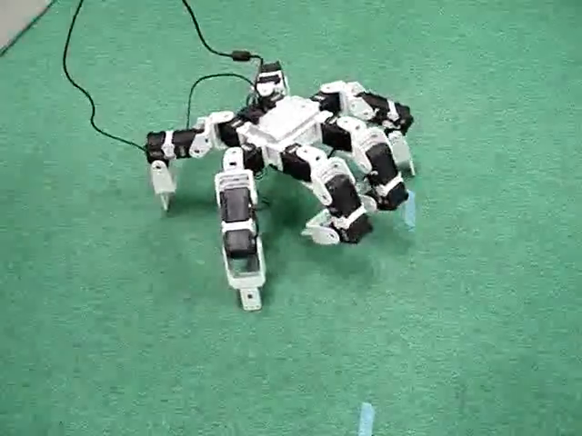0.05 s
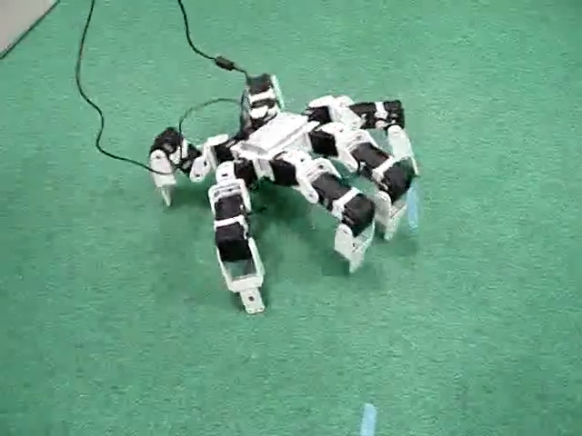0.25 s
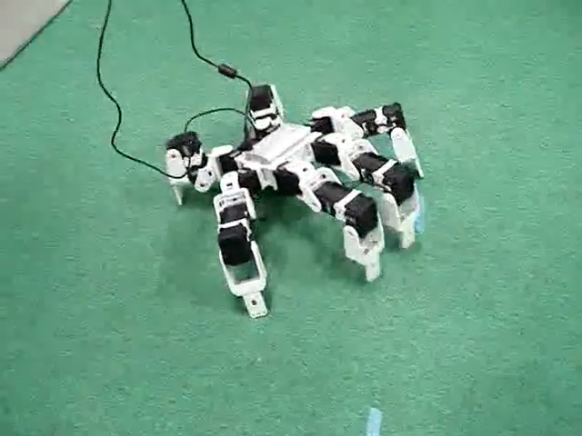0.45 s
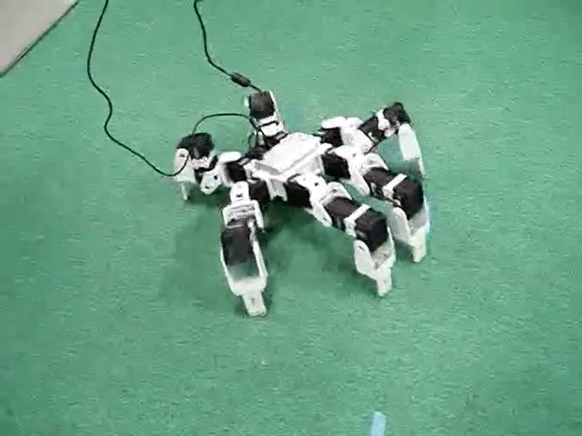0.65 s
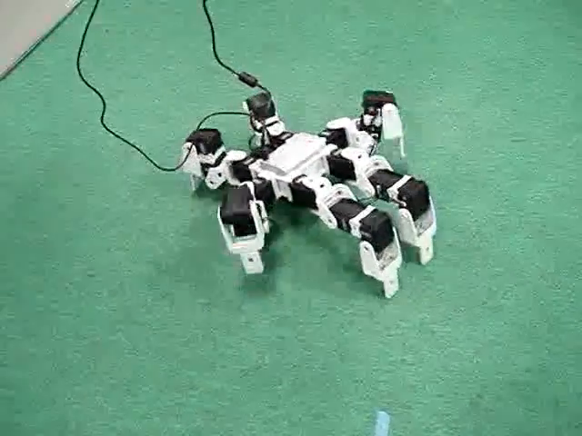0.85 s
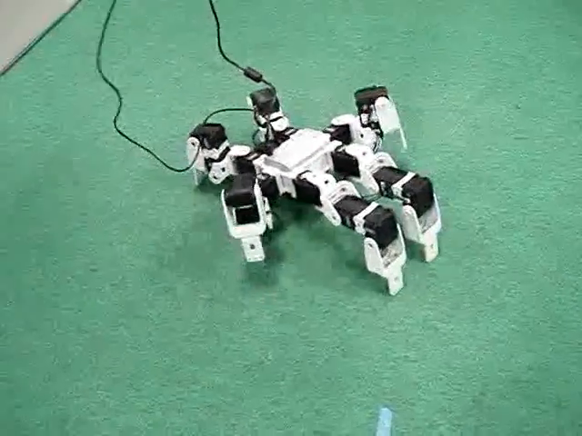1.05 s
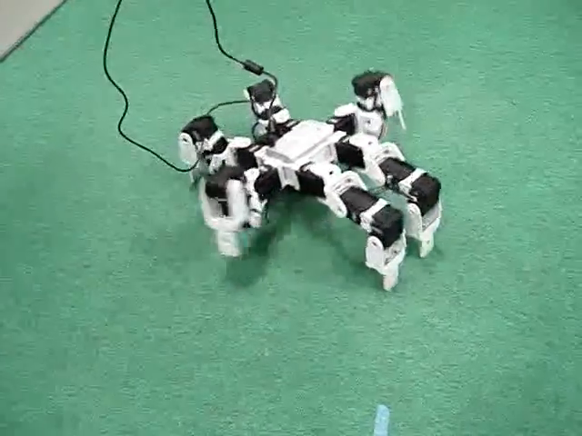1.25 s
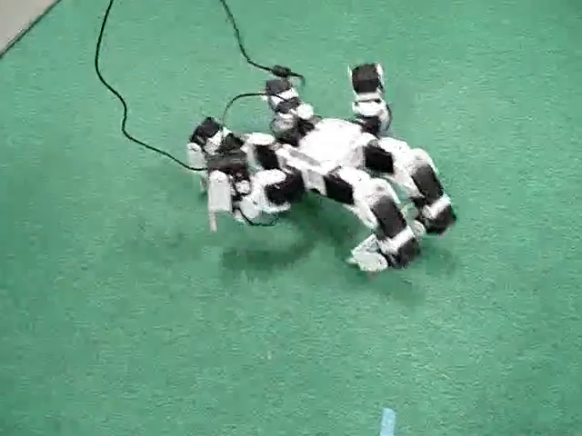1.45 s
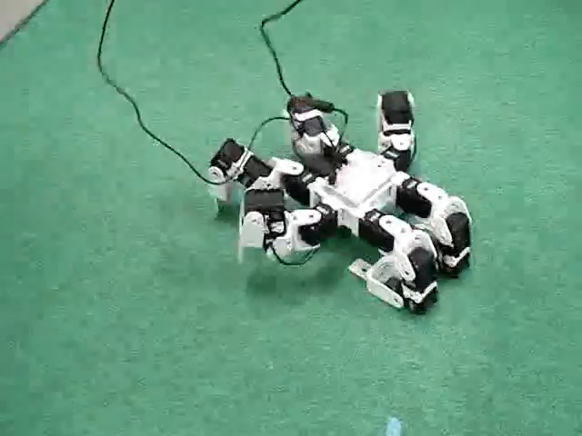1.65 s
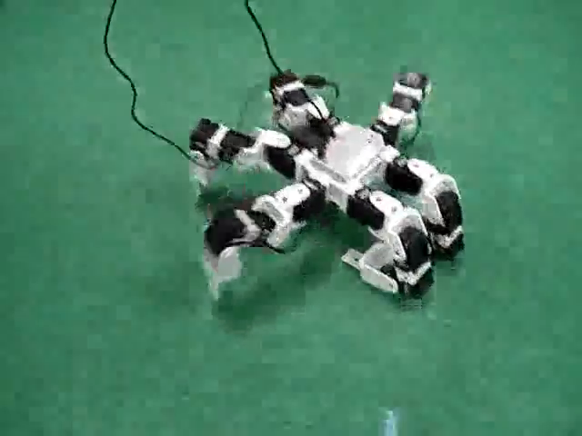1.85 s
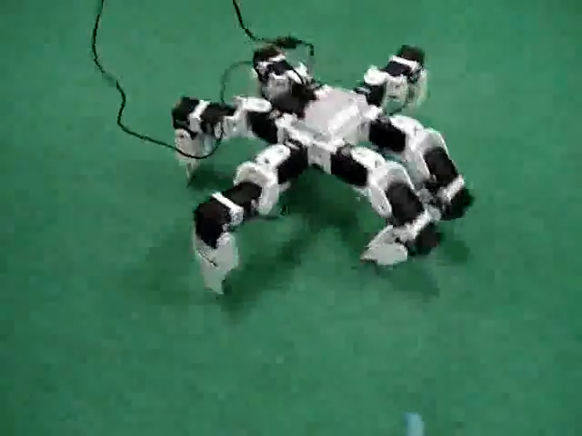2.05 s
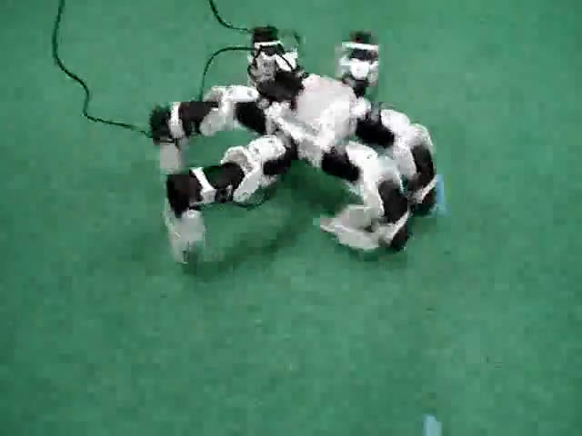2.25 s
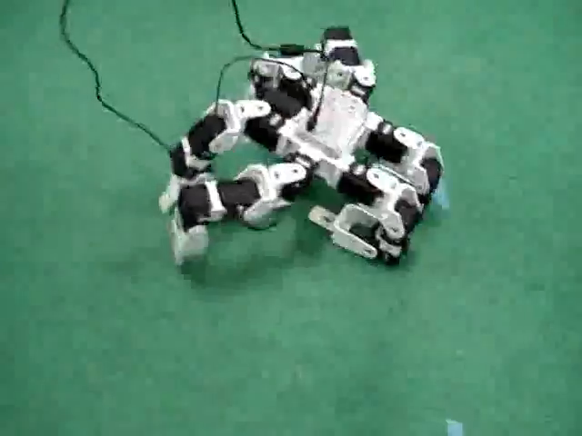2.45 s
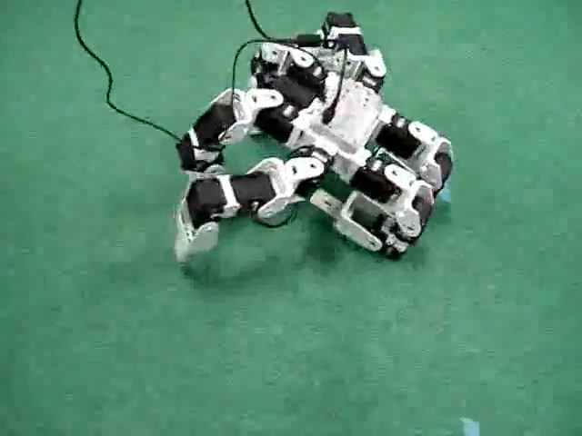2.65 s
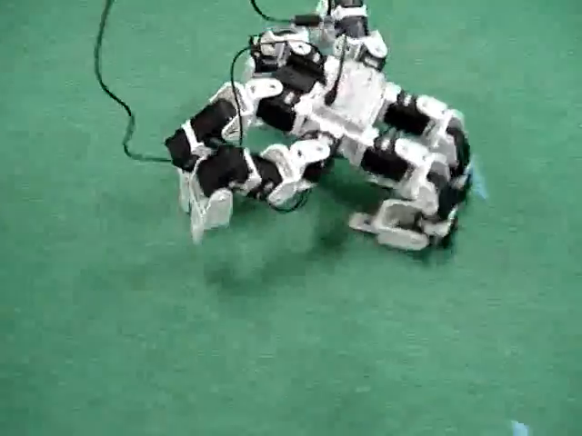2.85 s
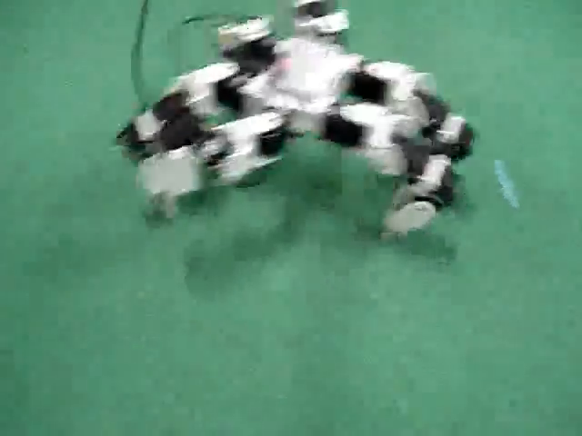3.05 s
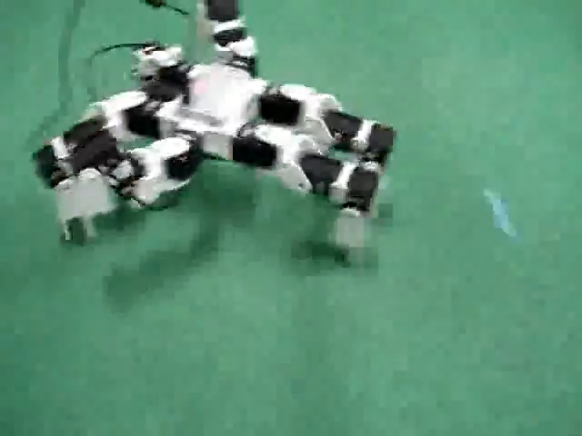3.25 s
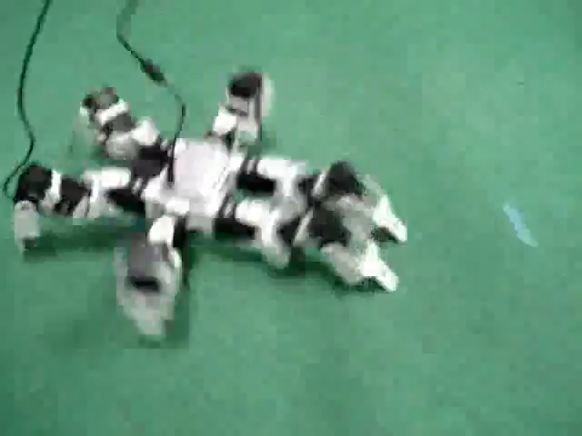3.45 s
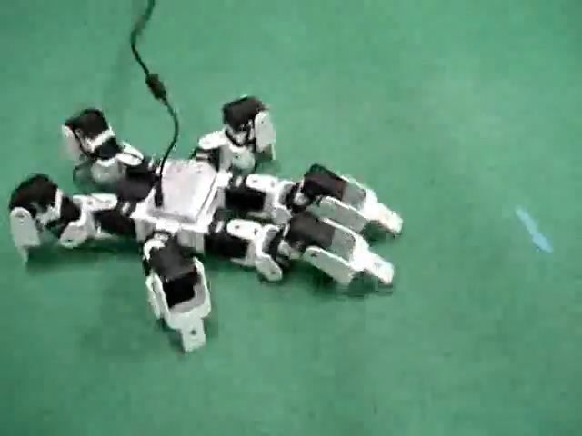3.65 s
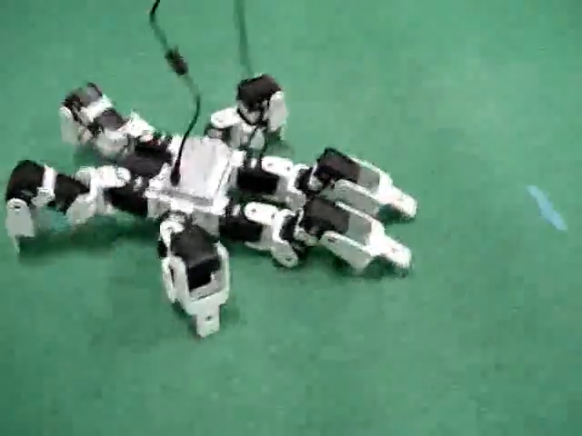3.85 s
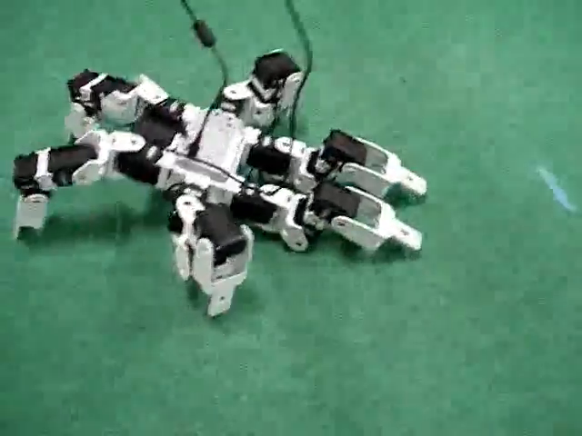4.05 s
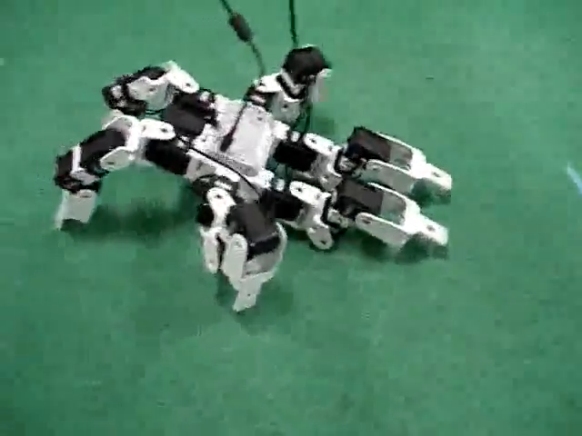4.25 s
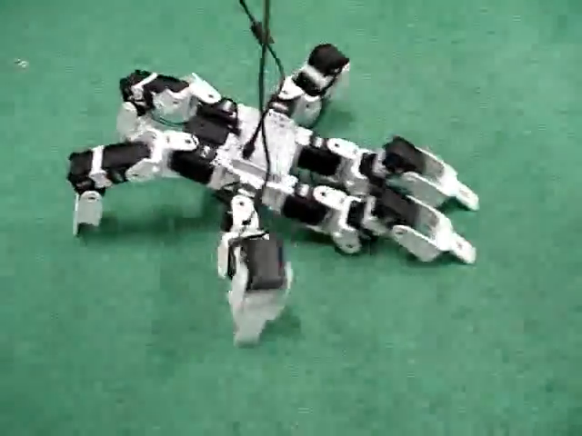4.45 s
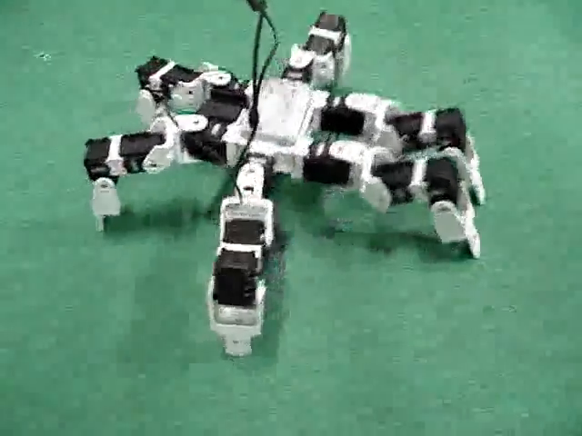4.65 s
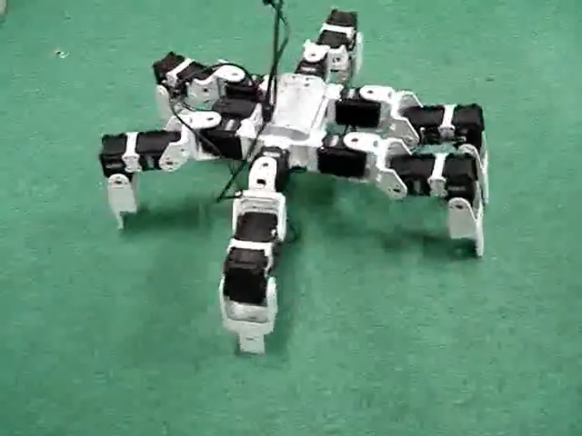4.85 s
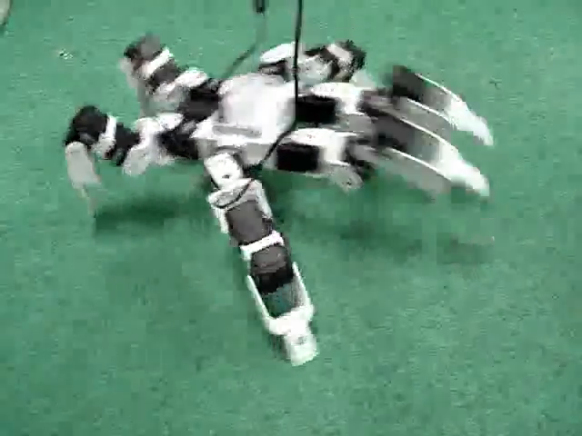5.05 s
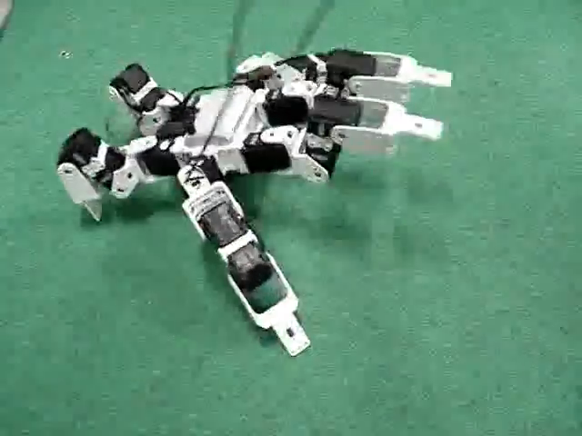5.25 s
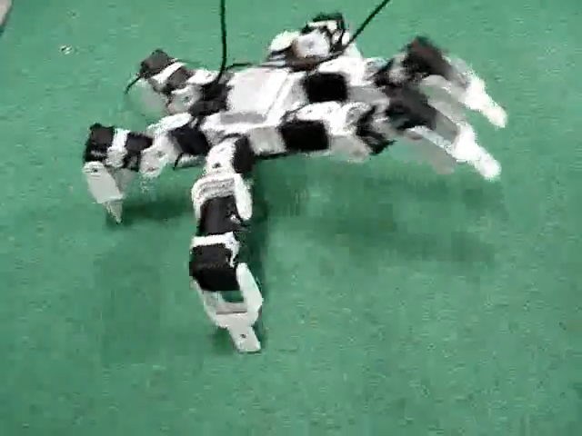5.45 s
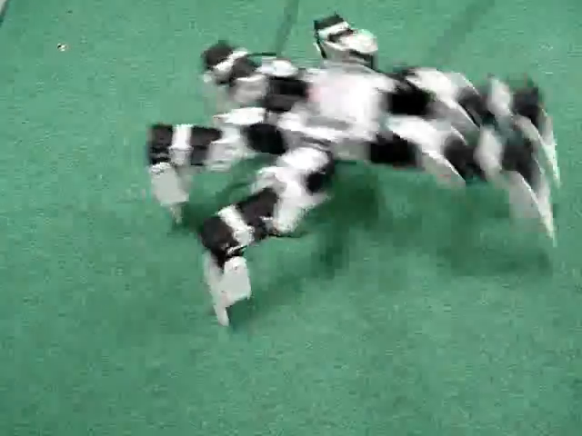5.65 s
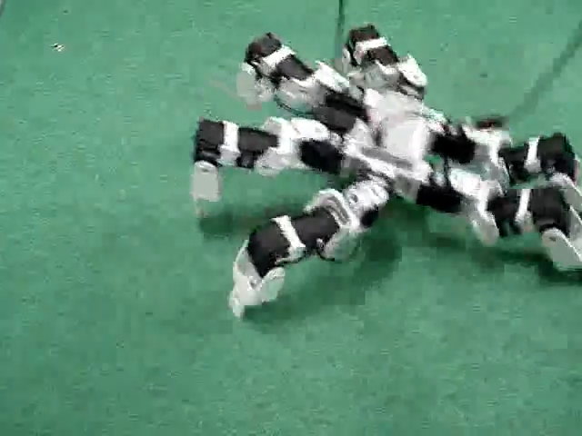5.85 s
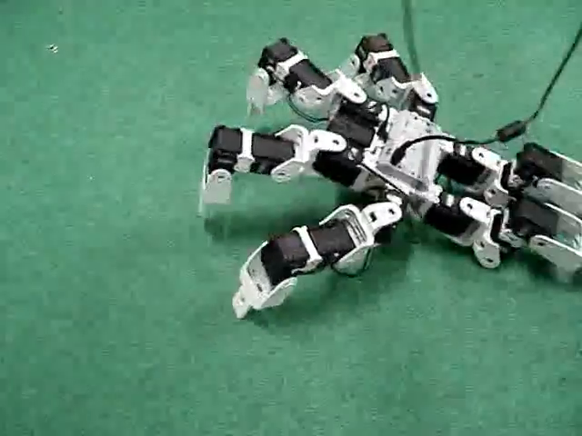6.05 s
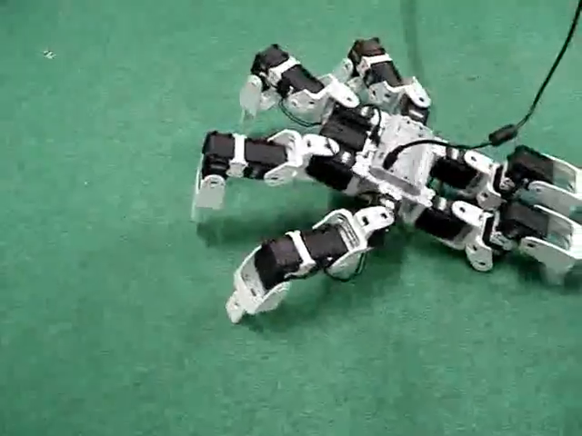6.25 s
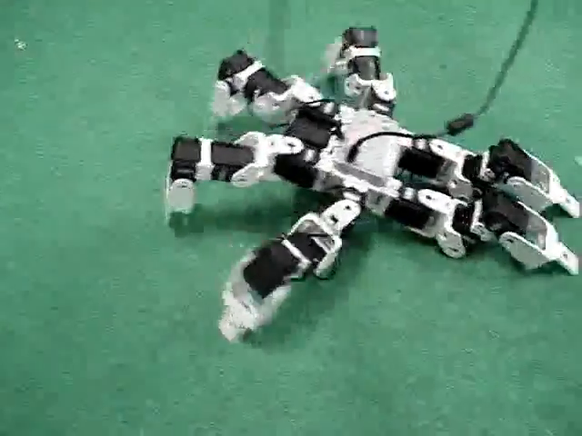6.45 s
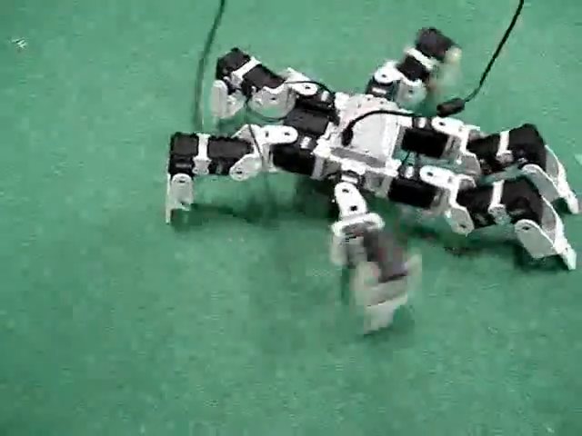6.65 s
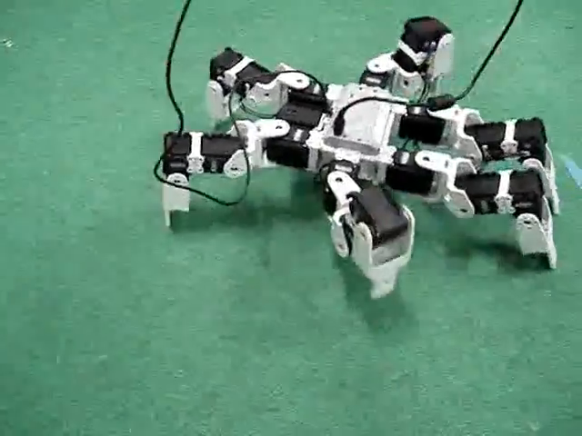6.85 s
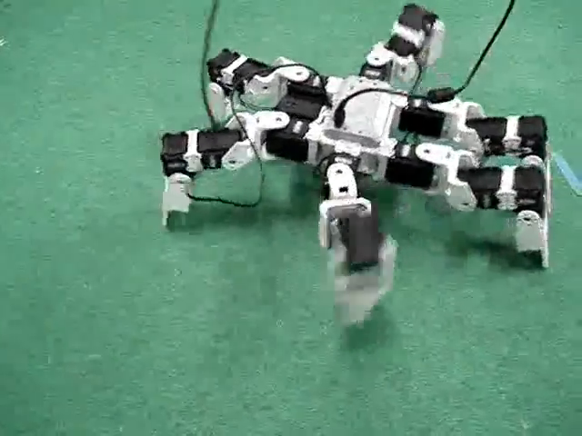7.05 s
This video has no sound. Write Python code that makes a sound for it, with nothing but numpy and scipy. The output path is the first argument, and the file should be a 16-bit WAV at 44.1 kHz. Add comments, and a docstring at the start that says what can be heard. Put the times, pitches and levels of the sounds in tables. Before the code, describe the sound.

Short, irregular spurts of raspy gear whirring and thin, high servo whines come from a little robot walking on carpet. Scattered plastic clacks from its feet and legs mark the steps. The whines grow denser midway and the knocks louder later on; the motors rest briefly, then start again. It is heard through a small mono microphone, with light room reverberation, a low ventilation hum and very faint handling thuds.

```python
"""The servo gearboxes of a small six-legged robot rattle and whine as it walks jerkily over carpet.
Uneven tooth impacts excite the cases in bursts; where one gear mesh stands out, its periodic force
sounds as a harmonic whine. Plastic feet and limbs knock and ring in their modes, and ventilation
rushes and hums below. The robot reverberates in the room. All is heard through a small mono
microphone, weak above 8.6 kHz; handling it or its cable adds faint, deep bumps."""
import sys
import numpy as np
from scipy import signal
from scipy.fft import rfft, irfft
from scipy.io import wavfile

SR = 44100
rng = np.random.default_rng(int(sys.argv[2]) if len(sys.argv) > 2 else 0)


def master_out(mix):
    """Clip the mix to full scale and print it as 16-bit PCM to the path in sys.argv[1]."""
    frames = np.transpose(np.atleast_2d(mix))
    ceiling = np.clip(frames, -1, 1)
    pcm = np.round(ceiling * 32767).astype(np.int16)
    wavfile.write(sys.argv[1], SR, pcm)


N = 313529


def from_db(db):
    """Amplitude ratio of a level in decibels."""
    return 10 ** (np.asarray(db) / 20)


def unit_rms(x):
    """Normalisation to an rms of 1."""
    return x / np.sqrt(np.mean(x ** 2) + 1e-20)


def at_times(rows, t):
    """Linear interpolation of each column over the times in the first."""
    times, *columns = np.transpose(rows)
    return [np.interp(t, times, column) for column in columns]


def at_hz(spectrum, hz):
    """Interpolation of a spectrum on a logarithmic frequency axis."""
    frequencies, levels = np.transpose(spectrum)
    return np.interp(np.log(hz), np.log(frequencies), levels)


def drift(corner_hz):
    """Random fluctuation: low-passed noise with an rms near 1."""
    pole = np.exp(-80 * np.pi * corner_hz / SR)   # runs at SR / 40
    slow = signal.lfilter([1], [1, -2 * pole, pole * pole], rng.standard_normal(N // 40 + 2002))[2000:]
    return np.interp(np.arange(N) / 40, np.arange(len(slow)), unit_rms(slow))


def resonator(force, hz, t60_s):
    """Damped oscillator: a unit impulse starts a decaying sine of amplitude 1."""
    r, w = from_db(-60 / (t60_s * SR)), 2 * np.pi * hz / SR
    return signal.lfilter([0, np.sin(w)], [1, -2 * r * np.cos(w), r * r], force + 1e-18)


def bands(sources, edges_hz):
    """Filter bank: yields centre frequency and band, drawing on the sources in turn."""
    for k, (low, high) in enumerate(zip(edges_hz, edges_hz[1:])):
        bandpass = signal.butter(2, [low, high], "band", fs=SR, output="sos")
        yield np.sqrt(low * high), signal.sosfilt(bandpass, sources[k % len(sources)])


# Servo movements; frame and treble are relative to the level:
# full_speed_s, length_s, level_db, swell_db, frame_db, treble_db
MOVES = [(0.0, 0.007, -35, -4, -0.5, -2.5), (0.06, 0.047, -36, 0, -7, -3.5),
         (0.149, 0.1, -31.5, 3, -4.5, 0.5), (0.282, 0.092, -29.5, -0.5, -6.5, -1.5),
         (0.443, 0.027, -41.5, 3, -7, -1), (0.659, 0.11, -28, -6.5, -6, 1.5),
         (0.791, 0.091, -30, -1.5, -4, 0), (0.954, 0.016, -35.5, 1, -7.5, 0),
         (1.042, 0.025, -40, 1, -9, -2), (1.255, 0.071, -31, 2, -3.5, 0), (1.358, 0.12, -27, -1, -8, 0.5),
         (1.524, 0.047, -32.5, 2.5, -6.5, -2.5), (1.659, 0.04, -41, -1.5, -6, -1.0),
         (1.756, 0.039, -29, 2, -5.5, 1.5), (1.833, 0.055, -27.5, -3.5, -6, 1),
         (1.915, 0.079, -31.5, 1.0, -2.5, 2.0), (2.052, 0.061, -35.5, -1.5, -6, -2.5),
         (2.167, 0.44, -37.5, 0, -4.0, -3.5), (2.261, 0.111, -26, 0, -6.5, 0),
         (2.38, 0.085, -28.5, 0.5, -9, -0.5), (2.66, 0.029, -31.5, -2, -7, -2.5),
         (2.754, 0.05, -29.5, 2.5, -6.5, -1.5), (2.832, 0.042, -29, 1.5, -7, 0),
         (2.954, 0.029, -30.5, -1.5, -6, 0.5), (3.038, 0.042, -33, 2.5, -5.0, -0.5),
         (3.125, 0.09, -32, 4.5, -6.5, -2.5), (3.297, 0.205, -35.5, -2.5, -3, -1.5),
         (3.37, 0.074, -28, 0, -2.5, 0.5), (3.494, 0.094, -27.5, 2, -5.5, -2),
         (3.649, 0.043, -33.5, 1.5, -3.5, -4), (3.765, 0.013, -40.5, 2.5, -5, -5),
         (3.857, 0.059, -29, -2, -7.5, -2.5), (3.944, 0.15, -34.5, 4, -8.0, 1.5),
         (4.086, 0.089, -34, 6.5, -10, -5), (4.254, 0.018, -29.5, -2, -8, -3),
         (4.369, 0.021, -27, -4, -10, -5.5), (4.452, 0.094, -25, -1, -6, -3),
         (4.539, 0.14, -28.5, 2.5, -8.5, -1), (4.63, 0.14, -32.5, -1.5, -9.5, -4),
         (4.962, 0.04, -28, 3.5, -5, -1.5), (5.038, 0.14, -26, -1.5, -6.5, 0),
         (5.276, 0.081, -30.5, -2.5, -6, -3.5), (5.375, 0.1, -28.0, 0.5, -6, -2),
         (5.509, 0.1, -37.5, 3, -2, 3), (5.655, 0.078, -31.5, -0.5, -0.5, -2),
         (5.85, 0.072, -33.5, 4.5, -1.5, -1), (5.96, 0.085, -32, -1.5, -5, -4.5),
         (6.466, 0.092, -24, -3, -7, -3.5), (6.57, 0.12, -32.5, 2.0, -4.0, -3.5),
         (6.74, 0.037, -31, 1.5, -4, 3), (6.847, 0.025, -32, -1.5, -6.5, -5),
         (6.956, 0.018, -45, -0.5, -6, -7.5), (7.056, 0.057, -28.5, 6, -8, -5)]
SPIN_UP_S, RUN_DOWN_DB_PER_S, HOLDING_DB = 0.043, 254, -63.5   # holding still, the servos only murmur


def servo_effort():
    """Incoherent sources add in power: gives the rattle level and relative frame and treble, in dB."""
    t = np.arange(0, N / SR, .002)
    full_speed_s, length_s, level_db, swell_db, frame_db, treble_db = np.transpose(MOVES)[:, :, None]
    age = t - full_speed_s
    speed = np.clip(1 + age / SPIN_UP_S, 1e-4, 1)
    running_db = level_db + swell_db * np.clip(age / length_s, 0, 1)
    run_down_db = RUN_DOWN_DB_PER_S * np.maximum(age - length_s, 0)
    power = speed ** 3 * from_db(running_db - run_down_db) ** 2
    total, frame, treble = [from_db(HOLDING_DB) ** 2 + np.sum(power * from_db(db) ** 2, axis=0)
                            for db in (0, frame_db, treble_db)]
    curves_db = 10 * np.log10([total, frame / total, treble / total])
    return at_times(np.transpose([t, *curves_db]), np.arange(N) / SR)


# Gearbox spectrum, before frame, case and treble are balanced: frequency_hz, density_db
GEARBOX_SPECTRUM = [(600, -14.5), (800, -21.5), (1030, -9.5), (1250, -7), (1600, -12.5), (2200, -9.5),
                    (2900, -9.5), (3430, -3.5), (4050, 0), (4600, -1.5), (5640, -2), (7280, -3),
                    (8500, -13), (11000, -11), (16000, -16.5)]
# Resonance of the servo cases: pitch_hz, t60_s, relative_db
CASE_MODE = (4010, 0.014, -16.5)
IMPACTS_PER_S, IMPACT_SPREAD_DB, LOAD_FLICKER_DB = 6000, 2.2, 1.9
MIC_EDGE_HZ = 8600


def gearbox_rattle(level_db, frame_db, treble_db):
    """Impact excitation: uneven teeth ring the cases, and each band flickers as the loads shift."""
    sizes = from_db(IMPACT_SPREAD_DB * np.minimum(rng.exponential(1, (2, N)), 5))
    signs = rng.choice([-1, 1], (2, N))
    impacts = sizes * signs * (rng.random((2, N)) < IMPACTS_PER_S / SR)
    registers = [0, 0, 0]   # frame, case, treble
    for hz, band in bands(impacts, 600 * 2 ** np.arange(0, 4.8, .25)):
        register = int(hz > 3000) + int(hz > 5700)
        registers[register] += band * from_db(at_hz(GEARBOX_SPECTRUM, hz) + LOAD_FLICKER_DB * drift(26))
    frame, case, treble = map(unit_rms, registers)
    mode_hz, mode_t60_s, mode_db = CASE_MODE
    ringing = unit_rms(resonator(impacts[0], mode_hz, mode_t60_s))
    case += from_db(mode_db + LOAD_FLICKER_DB * drift(26)) * ringing
    below_edge = signal.butter(8, MIC_EDGE_HZ, fs=SR, output="sos")
    treble /= np.std(signal.sosfilt(below_edge, treble))
    return from_db(level_db) * (from_db(frame_db) * frame + case + from_db(treble_db) * treble)


# Loudness of the ventilation: time_s, level_db
AIR_LEVEL = [(0.0, -41.5), (0.97, -40.5), (2.12, -37.5), (2.65, -43), (3.3, -38.5), (3.74, -43), (4.6, -39),
             (5.2, -44.5), (6.28, -43.5), (7.11, -41)]
# Spectrum of the rushing air: frequency_hz, density_db
AIR_SPECTRUM = [(25, -25), (60, -61), (90, -38.5), (120, -4), (160, -31), (250, -2.5), (400, -1.5),
                (570, -2), (900, -2), (1400, -5.5), (2500, -11), (4000, -18), (8500, -72), (16000, -25)]
# Ventilation hums: pitch_hz, width_hz (about 8 dB down), re_rush_db
AIR_HUMS = [(207.6, 18.4, -12.5), (267.8, 3.2, -17.5), (305, 11, -19.5), (566, 15, -14), (852.5, 12, -15.5)]


def ventilation():
    """Broadband air noise, with narrow resonances that waver because noise drives them."""
    white = rng.standard_normal((3, N))
    rush = sum(band * from_db(at_hz(AIR_SPECTRUM, hz) + drift(5.1))
               for hz, band in bands(white[:2], 25 * 2 ** np.arange(0, 9.4, 1 / 3)))
    hums = sum(from_db(re_rush_db) * unit_rms(resonator(white[2], hz, t60_s=4.9 / width_hz))
               for hz, width_hz, re_rush_db in AIR_HUMS)
    level_db = at_times(AIR_LEVEL, np.arange(N) / SR)[0]
    return from_db(level_db) * (unit_rms(rush) + hums)


FIRST_HARMONIC_DB, FOURTH_HARMONIC_DB = -15.5, -19   # relative to the second
RASP_DB, PITCH_WAVER_RATIO, WHINE_FLICKER_DB = -4.5, .007, 2


def gear_mesh(start_s, length_s, start_hz, middle_hz, end_hz, level_db, third_db, roughness):
    """Periodic meshing gives four harmonics of a gliding tooth rate; returns sample span and tone."""
    start, end = round(start_s * SR), min(round((start_s + length_s) * SR), N)
    progress = np.linspace(0, 1, end - start)
    bow_hz = (2 * middle_hz - start_hz - end_hz) * 2 * progress * (1 - progress)
    pitch_hz = start_hz + (end_hz - start_hz) * progress + bow_hz
    waver, rasp_real, rasp_imag, flicker = roughness[:, start:end]
    tooth_hz = pitch_hz / 2 * (1 + PITCH_WAVER_RATIO * waver)
    phasor = np.exp(2j * np.pi * np.cumsum(tooth_hz) / SR)
    harmonics_db = (FIRST_HARMONIC_DB, 0, third_db, FOURTH_HARMONIC_DB)
    tone = sum(from_db(db) * phasor ** n for n, db in enumerate(harmonics_db, 1))
    # Uneven teeth modulate amplitude and phase, giving each harmonic noise sidebands.
    tone *= 1 + from_db(RASP_DB) * (rasp_real + 1j * rasp_imag)
    swell = np.abs(np.sin(np.pi * progress)) ** 0.33
    return slice(start, end), tone.imag * swell * from_db(level_db + WHINE_FLICKER_DB * flicker)


# Whines of single servos. Pitch and level are those of the second harmonic; the third is relative to it:
# start_s, length_s, start_hz, middle_hz, end_hz, level_db, third_db
SERVO_WHINES = [(0.068, 0.05, 4300, 4190, 4100, -35, -16), (0.168, 0.067, 4000, 3920, 4030, -32, -9),
                (.26, 0.053, 6120, 6150, 5960, -29, -20), (0.293, .05, 4250, 4310, 4430, -35, -3),
                (0.708, 0.045, 5000, 4990, 5110, -26.5, -0.5), (0.761, 0.048, 5340, 5270, 5160, -29, -11),
                (1.335, 0.054, 3690, 3870, 3800, -27.5, -9), (1.42, 0.051, 3950, 4040, 4050, -30, -3),
                (1.763, 0.048, 3940, 4070, 4030, -33, -8), (1.827, 0.038, 7000, 7140, 7180, -22, -20),
                (2.265, 0.061, 3980, 4010, 4180, -21, -10), (2.361, 0.028, 5780, 5800, 6100, -25, -20),
                (2.445, 0.056, 4150, 4230, 4030, -29.5, -5), (2.645, .05, 4090, 3950, 4100, -37, -8),
                (2.649, 0.064, 3900, 3800, 3870, -35, -10), (2.75, 0.076, 3980, 4100, 4200, -37, 2),
                (2.83, 0.04, 4500, 4180, 3730, -23.5, -1.5), (3.137, 0.0346, 3500, 3760, 3850, -27, -14),
                (3.168, 0.052, 3630, 3950, 4250, -36, -12), (3.18, 0.058, 5160, 5160, 5330, -35, -12),
                (3.392, 0.043, 4250, 4920, 5250, -27, -13), (3.43, .04, 5750, 5900, 5800, -27, -20),
                (3.455, .035, 5100, 5400, 5650, -22.5, -15), (3.517, 0.036, 4110, 4910, 4800, -20.5, -16),
                (3.553, 0.049, 4545, 4170, 3690, -23, -12), (3.553, .035, 5550, 5200, 4670, -24, -12),
                (3.878, .055, 4370, 4550, 5020, -24, -8), (3.921, .095, 4980, 5100, 5020, -22.5, -17),
                (4.012, 0.084, 4860, 4750, 4680, -23, -9), (4.071, 0.051, 3910, 3900, 3840, -29, -11),
                (4.132, 0.062, 4500, 4920, 4650, -29, -5), (4.262, 0.04, 4530, 4510, 4400, -30, -18),
                (4.346, 0.034, 3900, 3900, 3800, -33, -20), (4.483, 0.055, 4700, 4360, 4030, -23.5, -15),
                (4.526, 0.11, 4800, 5110, 5340, -25, -20), (4.585, 0.11, 3420, 3570, 3770, -27.5, -7),
                (4.606, .1, 3950, 4150, 4310, -27.5, -10), (4.681, 0.059, 4260, 4120, 3350, -26, -16),
                (4.73, 0.038, 5130, 4780, 4140, -31, -20), (4.966, .075, 3700, 3986, 4340, -21.5, -10),
                (4.99, 0.098, 5710, 6350, 6030, -32, -20), (5.068, .1, 5950, 5870, 6300, -28, -20),
                (5.069, 0.079, 3850, 3900, 4000, -33, -10), (5.287, .05, 3800, 4170, 4080, -29.5, -14),
                (5.32, 0.053, 6050, 5640, 5460, -31, -9), (5.396, 0.12, 3870, 3796, 3830, -24.5, -7),
                (5.41, 0.097, 4910, 5280, 5430, -25, -21), (5.49, 0.084, 3880, 3970, 3690, -25, -17),
                (5.574, 0.061, 3750, 4060, 3870, -22.5, -3.5), (5.478, .075, 5600, 5950, 5280, -35, -20),
                (5.634, .06, 5260, 5010, 5400, -29, -19), (5.67, 0.041, 3600, 3600, 3460, -32, 2),
                (5.703, 0.038, 5100, 4960, 4940, -28.5, -12), (5.884, 0.078, 4690, 5270, 5680, -27, -12),
                (6.492, 0.057, 4080, 3980, 4130, -24, -9), (6.54, 0.052, 4110, 4350, 4550, -27, -13),
                (6.494, .045, 6120, 5930, 5820, -36, -20), (6.742, 0.062, 4250, 4140, 4100, -36, -19),
                (7.052, 0.083, 4050, 4090, 4100, -33, -20)]
STRAY_COUNT, STRAY_RE_RATTLE_DB = 160, -10


def servo_whines(rattle_db):
    """Superposed mesh tones: clear whines, and brief strays of other joints that follow the effort."""
    clear, strays = np.zeros(N), np.zeros(N)
    roughness = np.array([drift(60), drift(330), drift(330), drift(40)])
    for row in SERVO_WHINES:
        span, tone = gear_mesh(*row, roughness)
        clear[span] += tone
    for when, length, pitch, glide, size in rng.random((STRAY_COUNT, 5)):
        start_s, length_s = when * (N / SR - .1), 0.0162 + 0.0653 * length
        start_hz = 3500 + 2600 * pitch ** 1.6
        end_hz = start_hz * (.94 + .14 * glide)
        span, tone = gear_mesh(start_s, length_s, start_hz, (start_hz + end_hz) / 2, end_hz,
                               level_db=8 * size, third_db=-2, roughness=roughness)
        strays[span] += tone
    return clear + from_db(rattle_db + STRAY_RE_RATTLE_DB) * unit_rms(strays)


# Faint, deep bumps from handling the microphone or its cable: start_s, peak_rms_db
HANDLING_BUMPS = [(0.23, -51), (0.674, -52), (1.329, -51), (1.399, -56), (1.467, -55), (1.811, -51),
                  (1.944, -47), (2.264, -43), (3.05, -61), (3.371, -46), (3.999, -57), (4.458, -51),
                  (4.63, -62), (4.967, -47), (5.159, -59), (6.466, -51)]
BUMP_RISE_S, BUMP_T60_S = 0.027, 0.25


def handling_bumps():
    """Structure-borne noise in the microphone: a deep rumble swells quickly and decays exponentially."""
    t, envelope = np.arange(N) / SR, np.zeros(N)
    for start_s, peak_rms_db in HANDLING_BUMPS:
        age = np.maximum(t - start_s, 0)
        bump = from_db(-60 * age / BUMP_T60_S) * (1 - np.exp(-age / BUMP_RISE_S)) ** 2
        envelope += from_db(peak_rms_db) * bump / bump.max()
    deep_band = signal.butter(2, [10, 42], "band", fs=SR, output="sos")
    return envelope * unit_rms(signal.sosfilt(deep_band, rng.standard_normal(N)))


# Knocks of plastic feet and limbs; the last three columns weight the parts of each knock:
# start_s, gain_db, centre_hz, chatter_db, crack_db, thump_db
PLASTIC_KNOCKS = [(0.684, -17.5, 1930, -0.5, -14, -46), (1.488, -28.5, 1240, 7, -8, -26),
                  (1.531, -17.5, 1230, -6.5, -15, -31), (2.156, -21, 1360, -13, -6, -24),
                  (2.219, -22.5, 1250, -4, -9, -16), (2.27, -18, 1920, -8, -1, -27),
                  (2.36, -6.5, 2600, -9.5, -18, -38), (3.079, -19.5, 1700, -8, -10, -8),
                  (3.269, -17.5, 2050, -4.5, -14, -27), (3.525, -10, 1010, -21, -6, -44),
                  (3.978, -12, 1500, -28, -10, -35), (4.007, -18, 2510, -17, -2, -28),
                  (4.261, -14.5, 2430, -23, -6, -28), (5.107, -24, 2050, -8, 4, -41),
                  (5.184, -6.5, 2100, -9, -12, -31), (5.197, -8, 1170, -13, -10, -32),
                  (5.773, -3, 1320, -9, -8, -39), (5.786, -8.5, 2380, -9.5, -11.5, -39),
                  (5.803, -13.5, 2200, -10, -10, -35), (5.993, -4, 950, -10.5, -7, -38),
                  (6.464, -16, 1060, -12, -3, -38), (6.518, -11.5, 2680, -6.5, -4, -35)]
# Modes of the plastic shell: pitch_hz, gain_db, t60_s
SHELL_MODES = [(380, -9, 0.014), (511, -9.5, 0.017), (693, -12.5, 0.021), (960, -7, 0.014),
               (1297, -3, 0.01), (1675, -1.5, 0.0091), (2210, 3.5, 0.0044), (2700, -3, 0.014),
               (3150, -2, 0.0058), (4330, 1, 0.0063), (5270, -6, 0.0075), (7260, -17, .005)]
CONTACTS_PER_S, BLOW_T60_S, CHATTER_T60_S = 4000, 0.0082, 0.15
THUMP_HZ, THUMP_T60_S = 148, 0.029


def plastic_knocks():
    """Modal ringing: fast contacts strike the shell with a crack and a thump, then loose joints chatter."""
    out = np.zeros(N)
    contacts = rng.standard_normal(N) * (rng.random(N) < CONTACTS_PER_S / SR)
    crack_band = signal.butter(2, [3500, 8000], "band", fs=SR, output="sos")
    crack_noise = signal.sosfilt(crack_band, rng.standard_normal(N))
    scatters_db = rng.standard_normal((len(PLASTIC_KNOCKS), len(SHELL_MODES)))
    no_bass = signal.butter(3, 290, "high", fs=SR, output="sos")   # small parts radiate no bass
    t = np.arange(SR // 4) / SR
    blow = 0.46 * from_db(-60 * t / BLOW_T60_S)
    for knock, scatter_db in zip(PLASTIC_KNOCKS, scatters_db):
        start_s, gain_db, centre_hz, chatter_db, crack_db, thump_db = knock
        span = slice(round(start_s * SR), round(start_s * SR) + len(t))
        envelope = blow + from_db(chatter_db - 60 * t / CHATTER_T60_S)
        force = contacts[span] * envelope
        force[0] = 1   # first contact
        modes = 0
        for k, (hz, mode_db, t60_s) in enumerate(SHELL_MODES):
            coupling_db = -4 * abs(np.log2(hz / centre_hz))   # modes near the blow's centre ring most
            modes += (-1) ** k * from_db(mode_db + coupling_db + scatter_db[k]) * resonator(force, hz, t60_s)
        shell = from_db(-8) * signal.sosfilt(no_bass, modes)
        crack = from_db(crack_db + 4) * crack_noise[span] * envelope
        thump = np.sin(2 * np.pi * THUMP_HZ * t) * from_db(thump_db - 60 * t / THUMP_T60_S)
        out[span] += from_db(gain_db) * (shell + crack + thump)
    return out


ROOM_T60_S, ROOM_DB = 0.71, -14.5


def reverberation(direct):
    """Diffuse field: convolution with decaying noise, duller than the direct sound."""
    t = np.arange(round(.6 * SR)) / SR
    tail = rng.standard_normal(len(t)) * from_db(-60 * t / ROOM_T60_S) * (t > .008)
    tail = signal.lfilter([1], [1, -.5], tail)
    return from_db(ROOM_DB) * signal.fftconvolve(direct, tail / np.sqrt(np.sum(tail ** 2)))[:N]


def scene():
    """Superposition of the robot, its reverberation, the handling bumps and the air in one channel."""
    level_db, frame_db, treble_db = servo_effort()
    robot = gearbox_rattle(level_db, frame_db, treble_db) + servo_whines(level_db) + plastic_knocks()
    return (robot + reverberation(robot) + handling_bumps() + ventilation())[None]


MIC_TOP_DB, MIC_CUTOFF_HZ = -14.5, 15780


def record(dry):
    """Soft saturation rounds the peaks; the microphone's response steps down, then cuts off."""
    rounded = 0.76 * np.tanh(dry / 0.83)
    hz = np.fft.rfftfreq(N, 1 / SR)
    below_edge = 1 / (1 + np.exp(np.clip((hz - MIC_EDGE_HZ) / 50, -50, 50)))
    response = below_edge + (1 - below_edge) * from_db(MIC_TOP_DB)
    lowpass = signal.ellip(12, .5, 70, MIC_CUTOFF_HZ, fs=SR, output="sos")
    return signal.sosfilt(lowpass, irfft(rfft(rounded) * response, N))


dry = scene()
out = record(dry)
master_out(out)
```